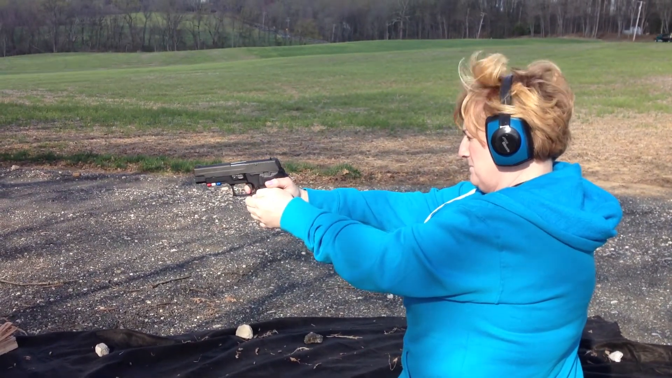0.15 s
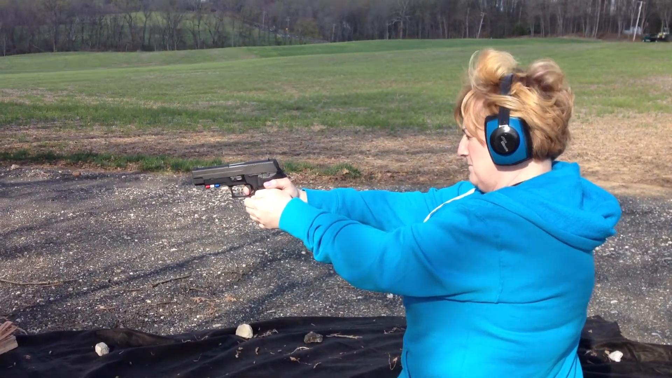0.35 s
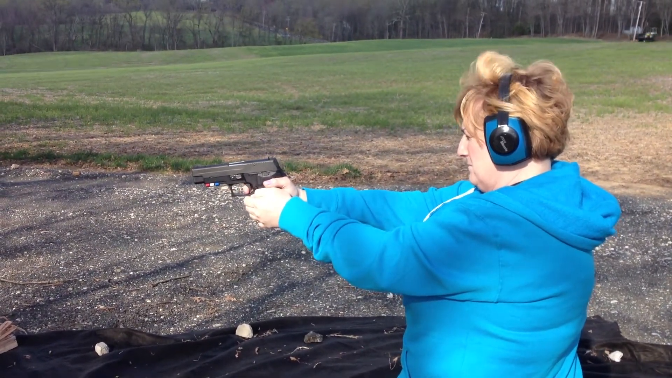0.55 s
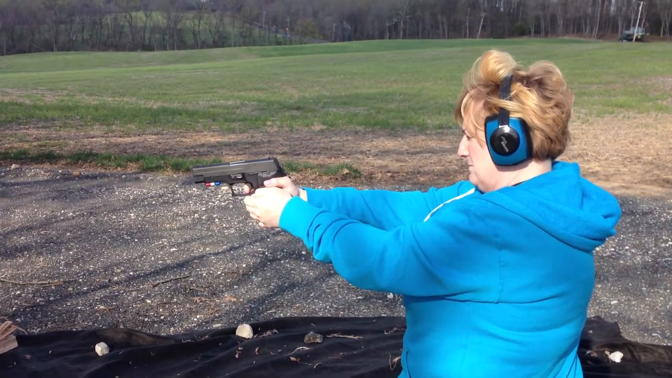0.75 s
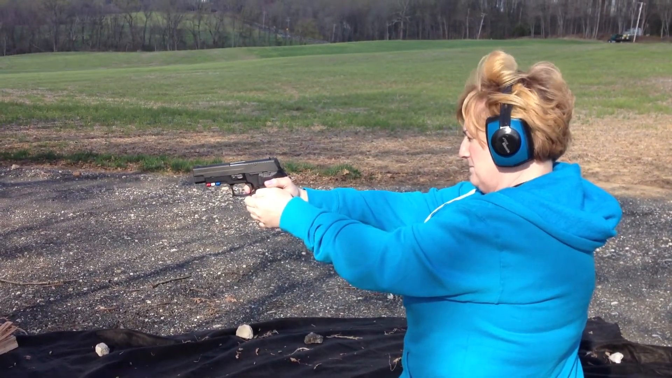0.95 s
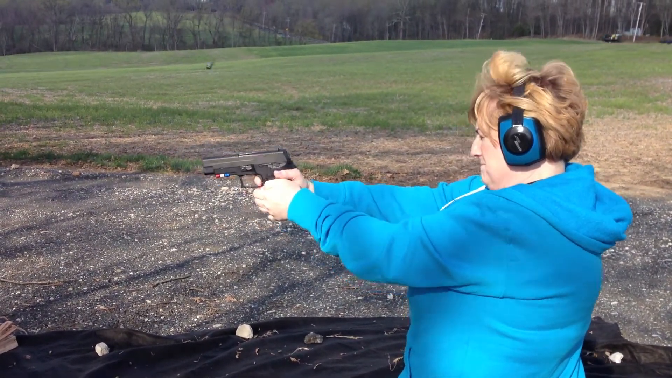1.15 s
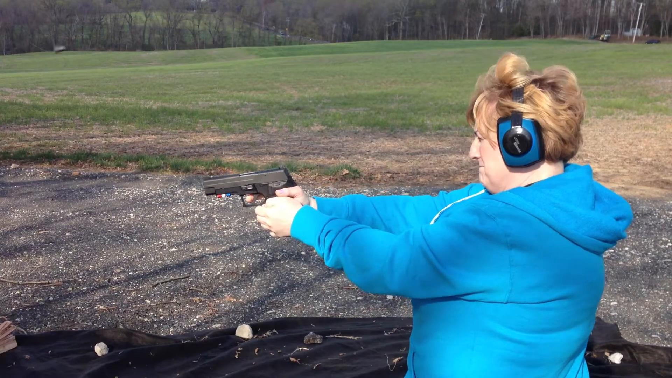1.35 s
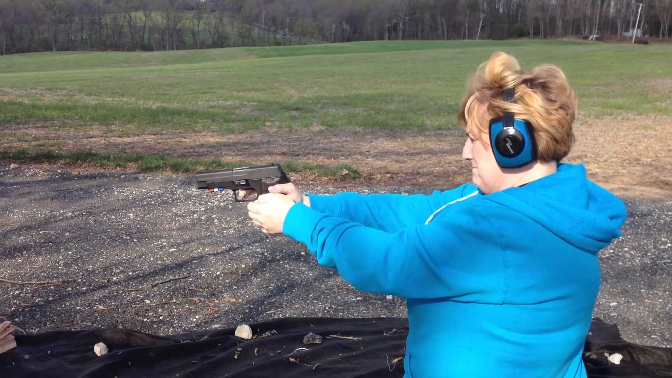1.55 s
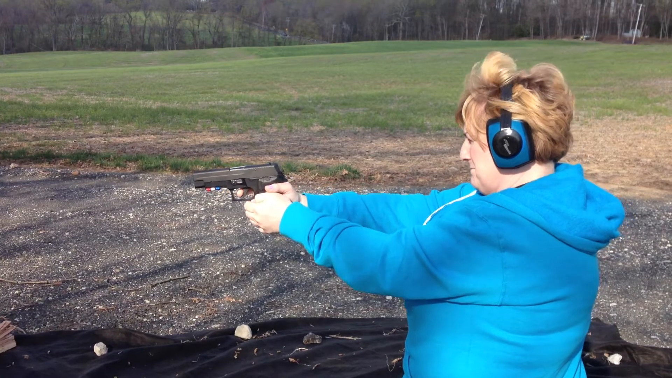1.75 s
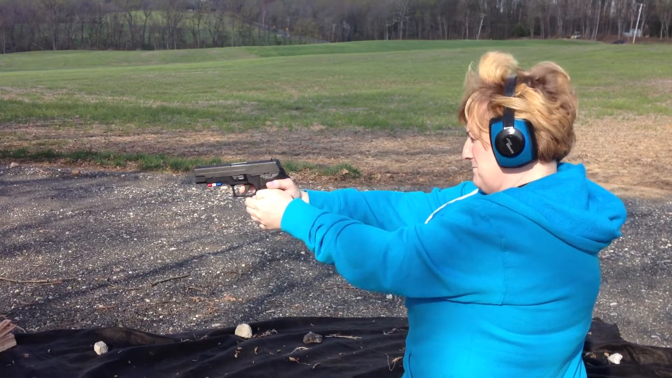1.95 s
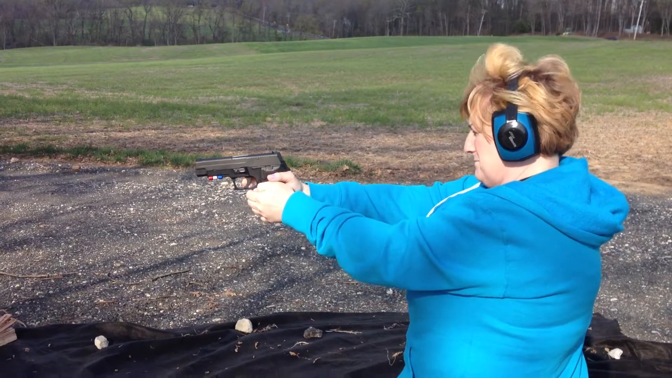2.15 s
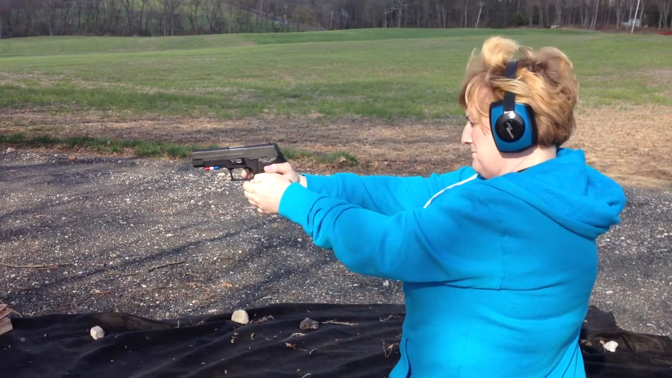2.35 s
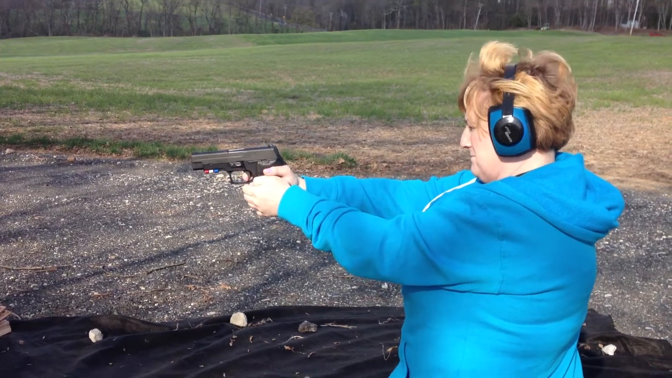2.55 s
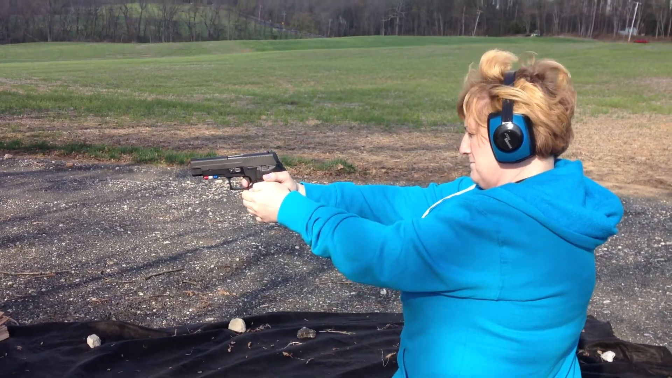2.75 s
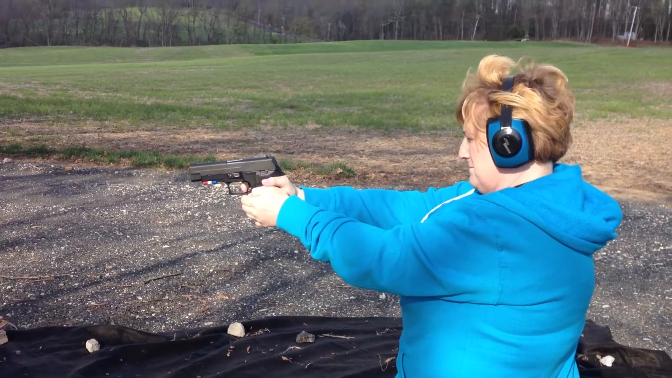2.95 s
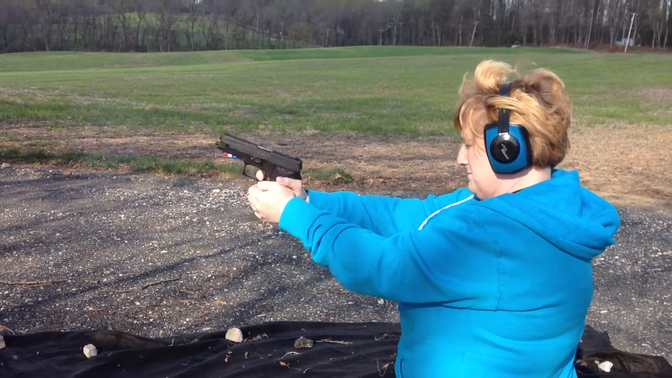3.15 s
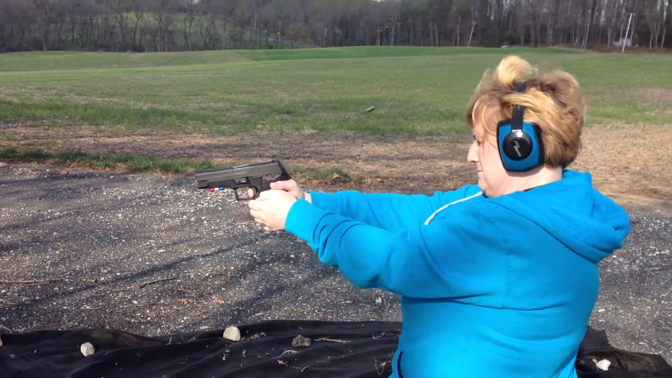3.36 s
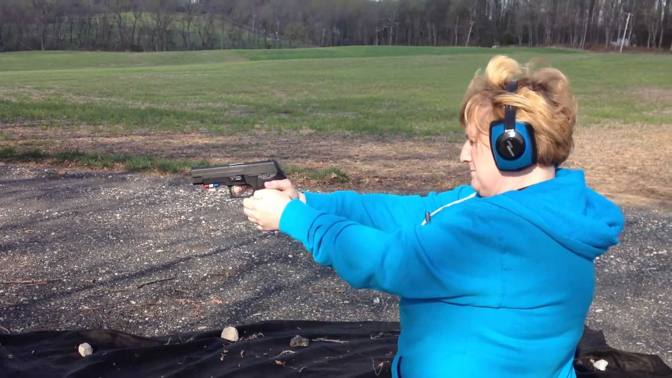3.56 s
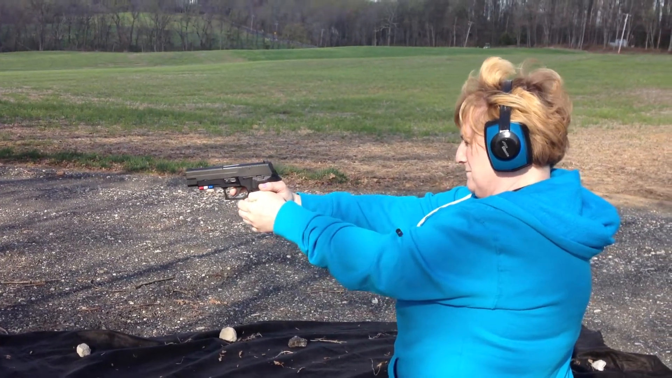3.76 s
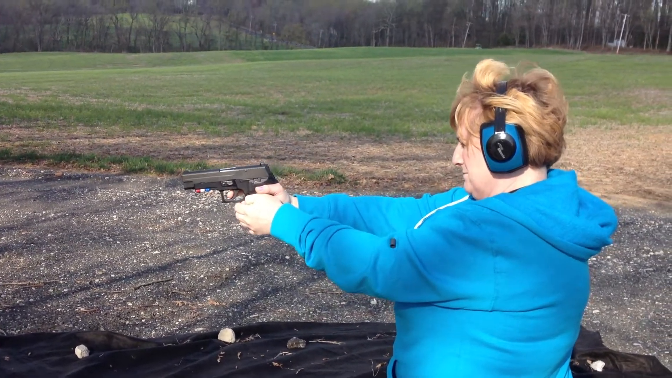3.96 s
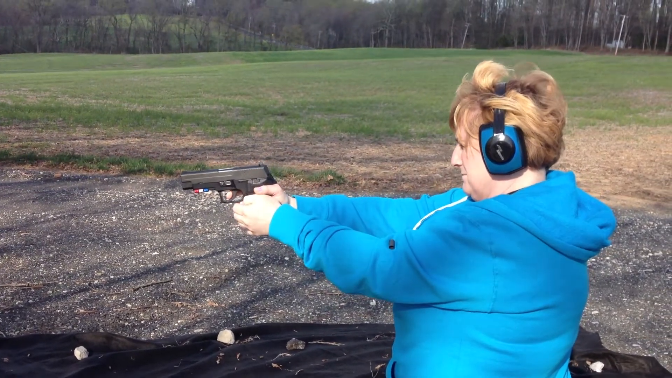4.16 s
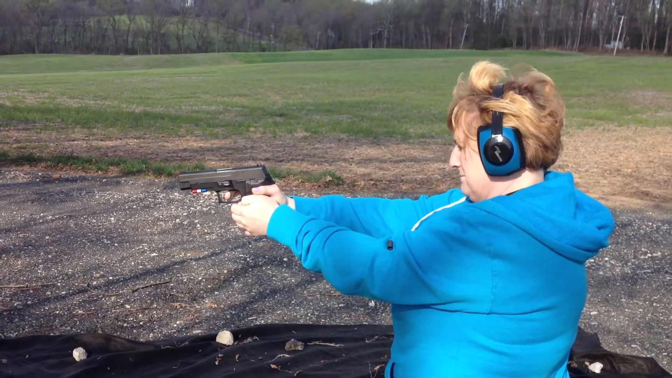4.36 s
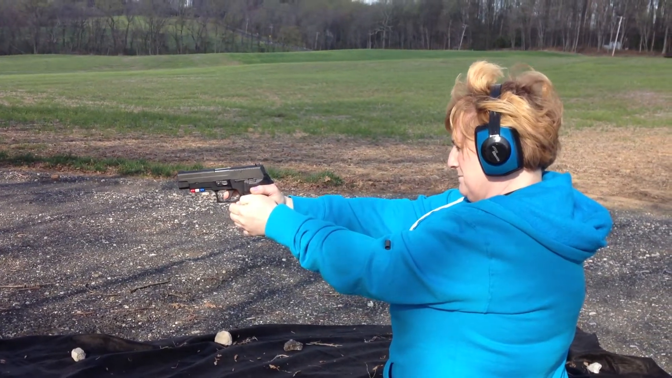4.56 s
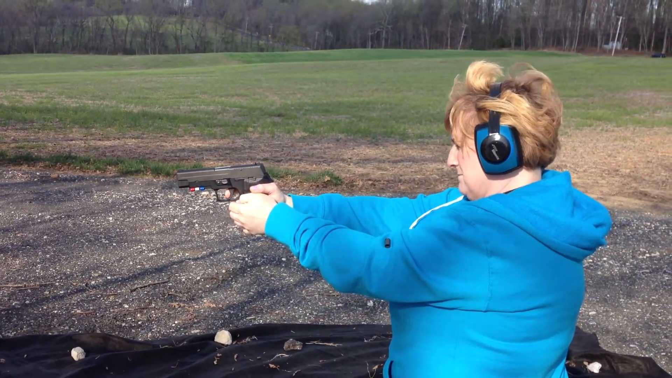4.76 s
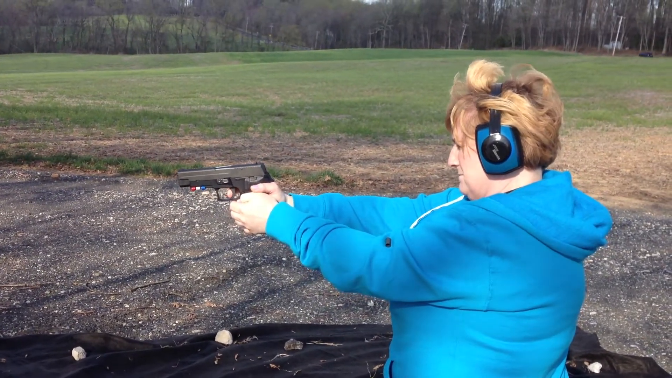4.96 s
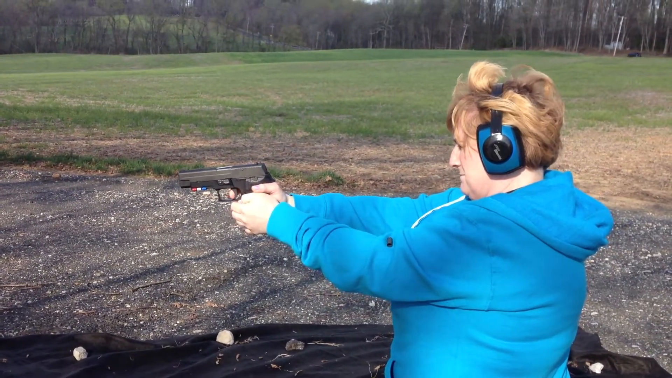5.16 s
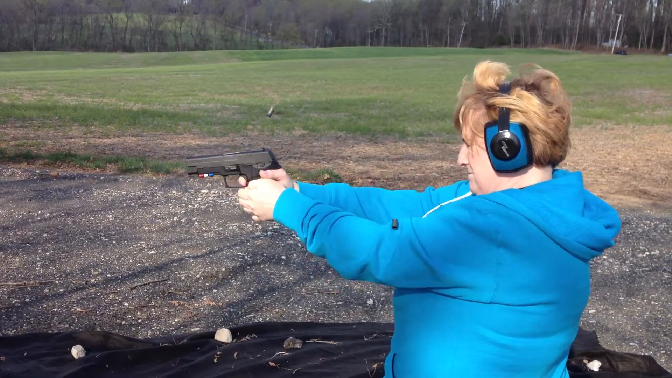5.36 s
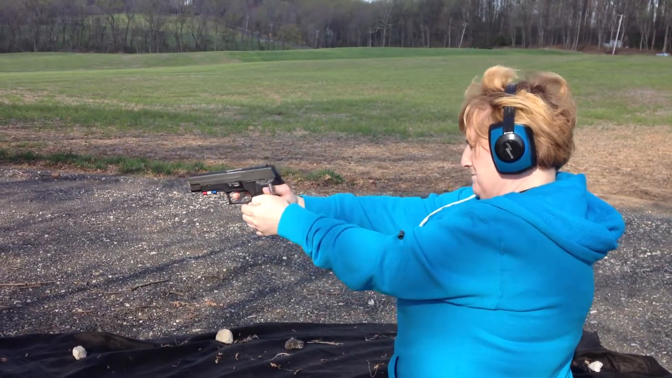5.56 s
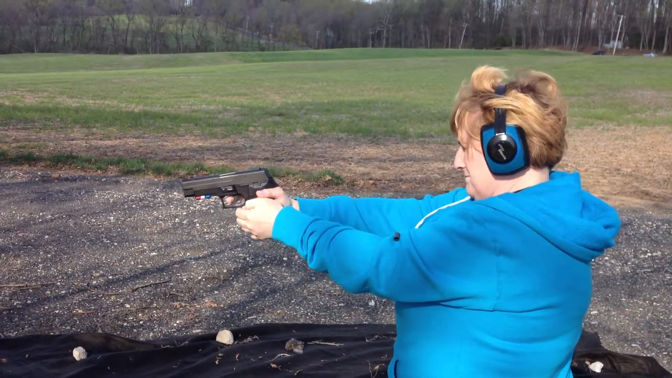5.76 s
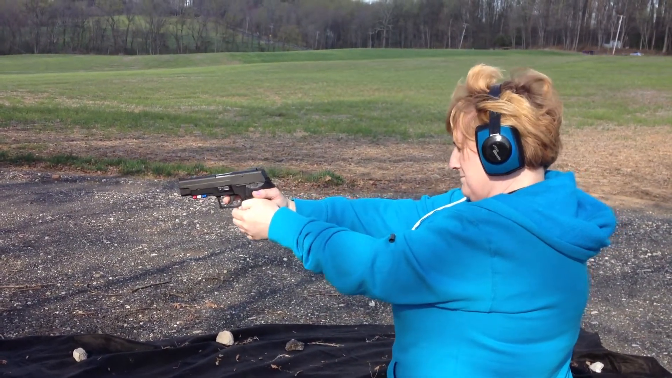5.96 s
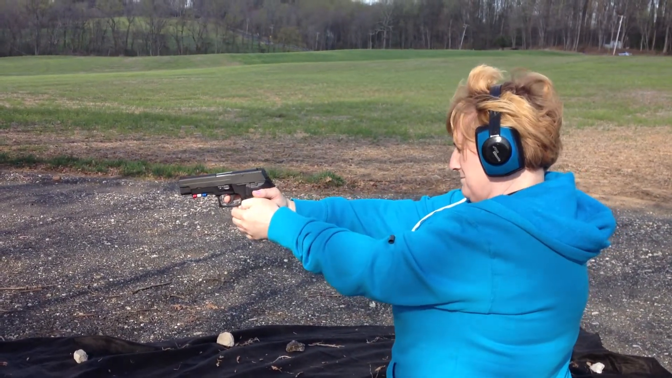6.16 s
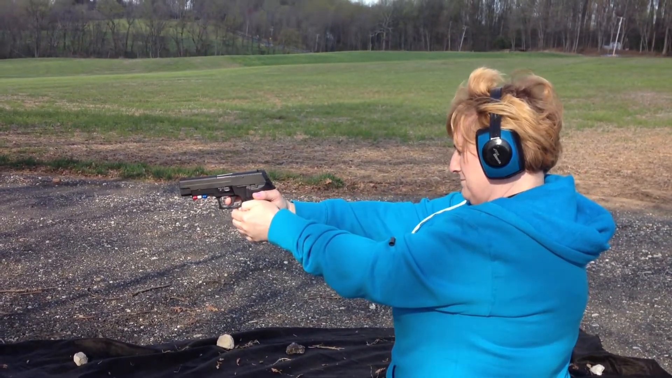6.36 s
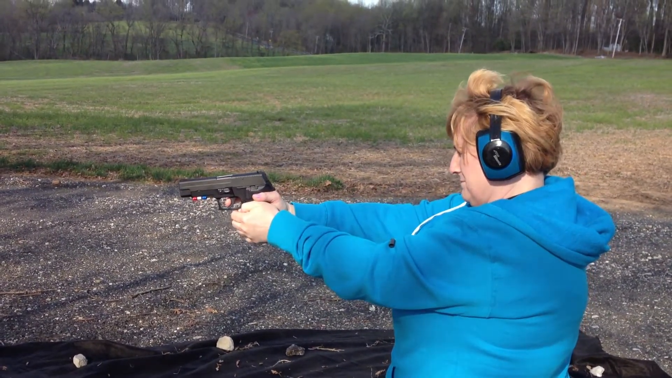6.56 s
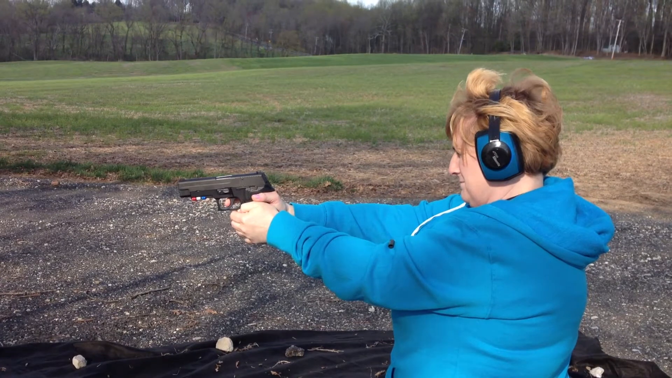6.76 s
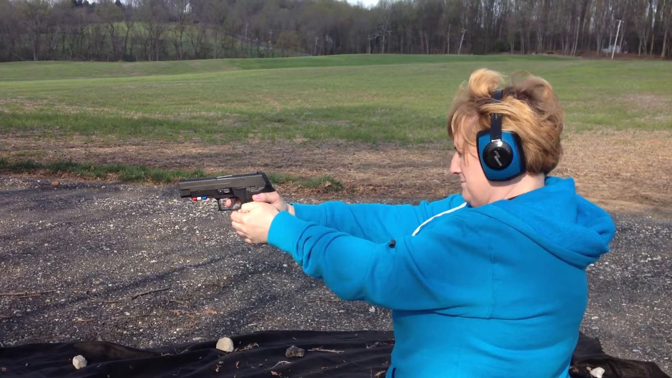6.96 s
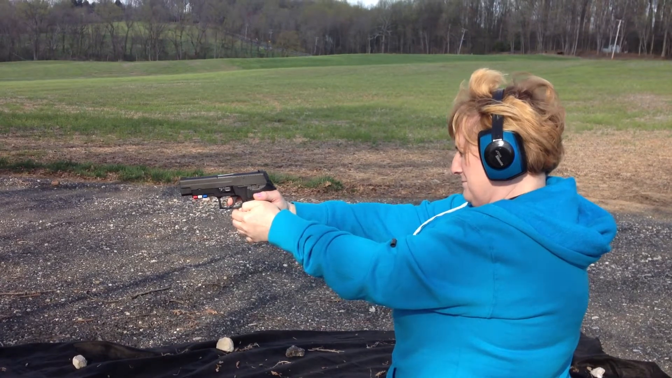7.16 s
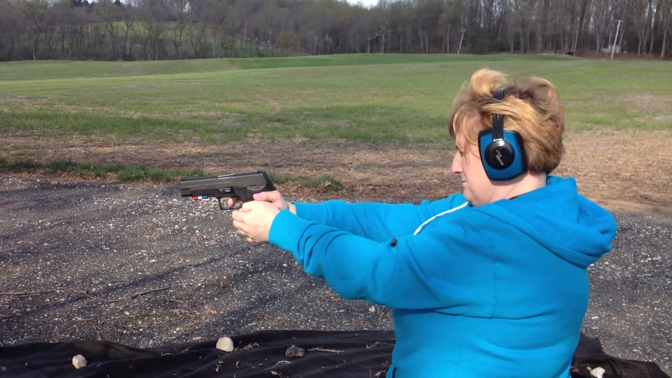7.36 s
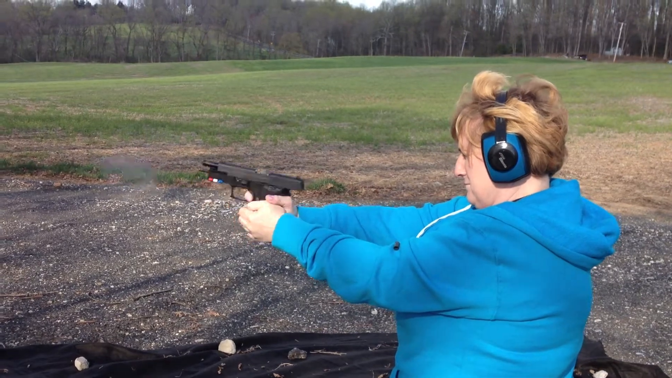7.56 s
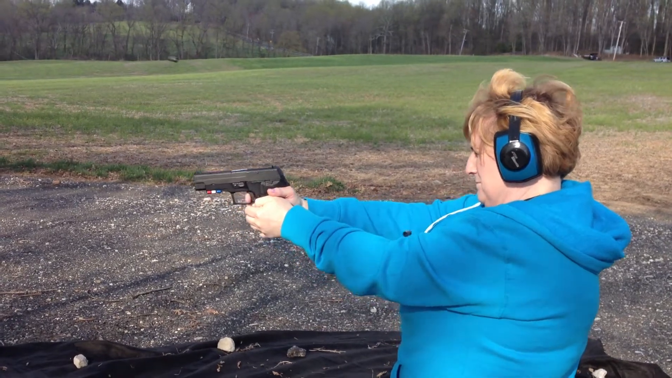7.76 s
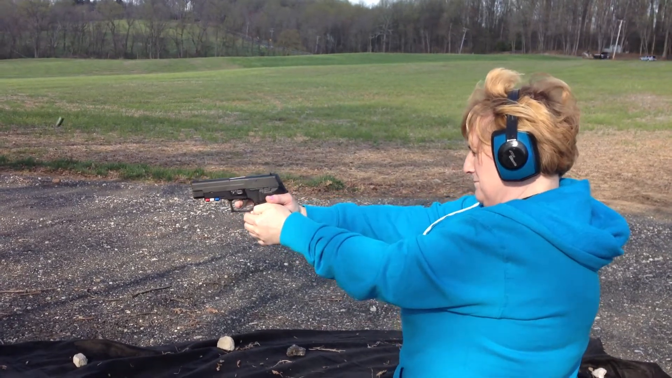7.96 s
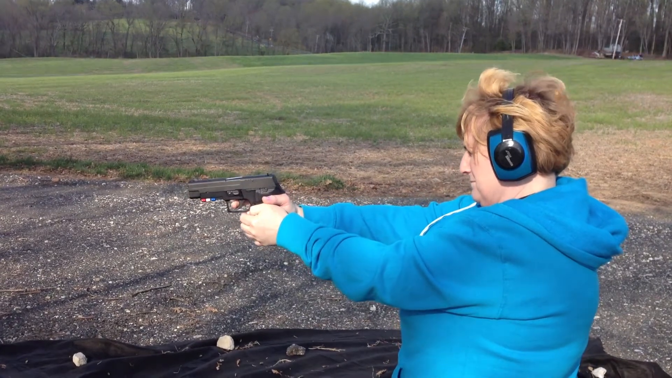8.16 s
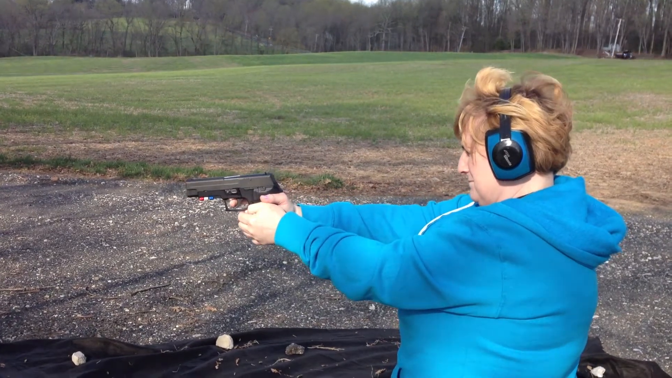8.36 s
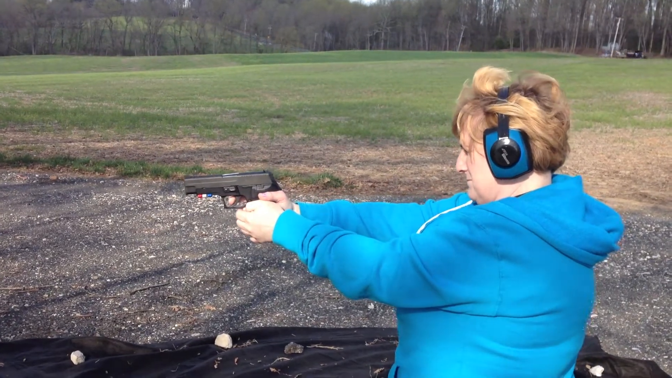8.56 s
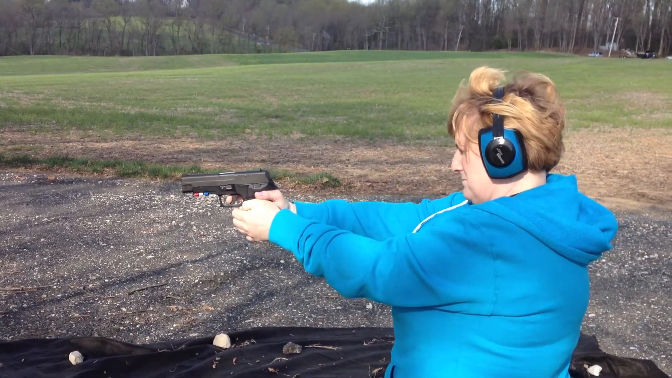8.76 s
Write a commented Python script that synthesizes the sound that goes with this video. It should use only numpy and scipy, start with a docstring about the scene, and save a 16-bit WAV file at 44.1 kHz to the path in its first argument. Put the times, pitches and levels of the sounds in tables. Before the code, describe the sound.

An open outdoor gravel range, heard through a small microphone a couple of metres from a pistol. The first second holds faint hiss, a smooth wash of distant trees, leaf rustle and a low wind bump near 0.7. Sharp, overloaded shots crack at about 1.05, 3.15, 5.25 and 7.6 seconds, each a very short tearing blast with a midrange body, then a dense rolling echo from banks and trees, fading within a second. The background ducks after each blast and creeps back. A quiet double click of the trigger follows roughly 0.3 seconds after each shot. Small ticks of cases and grit on gravel come near 1.9, 6.1 and 8.5, with a tiny metallic ring at 6.16. Wind buffets in low, ragged thumps, notably at 1.4, 1.9, 2.7, 3.7 and 8.4, while dry leaves hiss and crackle to the end near 9 seconds.

```python
"""Slow pistol fire on a gravel range

Four shots on open ground, a couple of metres from a small microphone: noise bursts with slow pressure swings.
Each blast overloads the recorder, whose gain drops and creeps back under a rolling echo of scattered noise.
After each shot the trigger resets with a double click; cases and grit tick on the gravel, and one case rings.
Wind buffets the microphone as low, ragged swings, stirs dry leaves into hiss and ticks,
and washes through far trees as smooth noise; the microphone adds a faint steady hiss."""
import sys
import numpy as np
from scipy import signal
from scipy.fft import rfft, irfft, next_fast_len
from scipy.io import wavfile
from scipy.ndimage import uniform_filter1d

SR = 44100
rng = np.random.default_rng(int(sys.argv[2]) if len(sys.argv) > 2 else 0)


def int16_out(signal):
    """Quantize to a 16-bit WAV file."""
    q = np.round(np.clip(np.atleast_2d(signal).T, -1, 1) * 32767)
    wavfile.write(sys.argv[1], SR, q.astype(np.int16))


N = 388067

# the shots: [t/s, relative blast level/dB, relative echo level/dB]
SHOTS = [(1.0543, 15, 14.5), (3.1598, 13.5, 12), (5.2598, 13, 12.5), (7.5911, 13.5, 12.5)]


def pistol(patchy_db=2):
    """Every shot excites the same surroundings, whose clumps of trees answer unevenly."""
    t = np.arange(SR) / SR
    out = np.zeros(N)
    shock, terrain = rng.standard_normal((2, SR))
    # unevenness over frequency bins and 128-sample delay steps
    clumps = rng.standard_normal((129, SR // 100))
    clumps = uniform_filter1d(clumps, size=6, axis=0)
    clumps = uniform_filter1d(clumps, size=4, axis=1)
    patches_db = patchy_db * evened(clumps)
    for s, blast_db, echo_db in SHOTS:
        add(out, s, amp(blast_db) * blast(shock, t))
        add(out, s, amp(echo_db) * echo(terrain, patches_db, t))
    return out


# spectrum of the tearing crack: [f/Hz, relative level/dB]
CRACK_COLOUR = [(300, -35), (1200, -7.5), (2000, 2), (3000, 0), (4500, 0), (6500, 3), (9000, 2),
                (10500, -2), (14000, -2), (15700, -8)]
# spectrum of the body: [f/Hz, relative level/dB]
BODY_COLOUR = [(20, -27), (60, -27.5), (150, -13), (280, -6), (450, -4), (700, -1), (1000, -3), (1330, 3.5),
               (1850, -11.5), (3000, -25.5), (8000, -57)]
# muzzle blast, then slamming slide: [peak t/s after the shot, relative crack level/dB,
# relative body level/dB, fall/dB per s]
SURGES = [(.0047, 1.5, 3, 498), (.029, -3, 3, 1301.5)]
# slow pressure swings: [centre t/s after the shot, f/Hz, relative level/dB]
THUMPS = [(.006, 36, -42), (.0365, 195, -19.5)]
CRACK_DB, BODY_DB = -14.5, -13.5
CRACK_SWELL_S, BODY_SWELL_S, BODY_DELAY_S = .005, .003, .0022  # the body follows the crack
# the crack comes back off the near gravel
SIZZLE_S, SIZZLE_RISE_S, SIZZLE_DB, SIZZLE_FALL_DB_PER_S = .048, .015, -14, 266.5


def blast(shock, t):
    """Muzzle blast and slide: a body alike in every shot, a fresh tearing crack and slow pressure swings."""
    sizzle = amp(SIZZLE_DB) * surge(t - SIZZLE_S, SIZZLE_RISE_S, SIZZLE_FALL_DB_PER_S)
    crack_power = sizzle ** 2
    body_power = 0
    for s, crack_db, body_db, fall in SURGES:
        crack_power += (amp(crack_db) * surge(t - s, CRACK_SWELL_S, fall)) ** 2
        body_power += (amp(body_db) * surge(t - s - BODY_DELAY_S, BODY_SWELL_S, fall)) ** 2
    crack = amp(CRACK_DB) * colour(np.sqrt(crack_power) * rng.standard_normal(len(t)), CRACK_COLOUR)
    body = amp(BODY_DB) * colour(np.sqrt(body_power) * shock, BODY_COLOUR)
    thumps = np.zeros(len(t))
    for s, hz, db in THUMPS:
        swing = np.cos(2 * np.pi * hz * (t - s))
        thumps += amp(db) * swing * np.exp(-(hz * (t - s)) ** 2)
    return crack + body + thumps * np.minimum(t / .002, 1)  # the swings start from rest


def surge(t, rise_s, fall_db_per_s):
    """Swells its last 20 dB in rise_s, reaches one at t = 0, then dies away."""
    return amp(np.minimum(20 * t / rise_s, -fall_db_per_s * t))


# single echoes off banks and fixtures: [t/s after the shot, relative level/dB]
ECHOES = [(.0460, 0), (0.0513, -8.5), (.071, -7.5), (0.0906, -11), (.096, -4), (.1295, -7.5),
          (0.1483, -9.5)]
# spectrum of the whole echo: [f/Hz, relative level/dB]
ECHO_COLOUR = [(60, -62.5), (120, -30.5), (210, -12.5), (300, -0.5), (410, -5), (520, 0), (620, 1),
               (850, -1), (1180, -1.5), (1420, -4.5), (1650, -9.5), (2250, -11), (3100, -18.5), (4400, -24),
               (8000, -26), (15500, -45.5)]
# loss along the path, on top of the ground loss: [f/Hz, loss/dB per s]
AIR = [(200, -2), (900, 5), (2000, 20.5), (4200, 20.5), (8000, 57), (14000, 119.5)]
# how much scatter is alike in every shot: [f/Hz, share of power]
REPEAT = [(1000, 1), (2200, 0.99), (4000, 1), (7000, .05)]
ECHO_DB = 10.5  # single echoes against the scatter


def echo(terrain, patches_db, t):
    """The range answers each shot alike up to the mid treble; above, moving air scrambles and absorbs it."""
    alike = np.clip(read(REPEAT, np.fft.rfftfreq(len(t), 1 / SR)), 0, 1)
    fresh = rfft(rng.standard_normal(len(t)))
    scatter = irfft(np.sqrt(alike) * rfft(terrain) + np.sqrt(1 - alike) * fresh, len(t))
    hz, delay, z = signal.stft(roll(t) * scatter, SR, nperseg=256)
    air_db = read(AIR, hz)[:, None] * (delay - 0.1814)  # zero at this delay
    z = z * amp(patches_db[:len(hz), :len(delay)] - air_db)
    paths = signal.istft(z, SR, nperseg=256)[1][:len(t)]
    for s, db in ECHOES:  # broad surfaces return a rounded pressure wave
        add(paths, s, amp(ECHO_DB + db) * signal.windows.hann(29) / 14)
    return colour(paths, ECHO_COLOUR)


# scatter from gravel, grass and trees starts at the first bank, then thins with distance
SCATTER_DB, SCATTER_START_S, SCATTER_RISE_S = -19, .044, .006
SPREAD_S, SPREAD_POWER, GROUND_LOSS_DB_PER_S = .11, 3.23, 34
TREE_LINE_S, TREE_LINE_WIDTH_S, TREE_LINE_DB = .388, .016, 3.5  # the edge of the wood answers late


def roll(t):
    """Strength of the scatter: it spreads and fades with distance, and swells once at the tree line."""
    onset = np.clip((t - SCATTER_START_S) / SCATTER_RISE_S, 0, 1)
    tree_line = np.exp(-((t - TREE_LINE_S) / TREE_LINE_WIDTH_S) ** 2)
    strength = amp(SCATTER_DB - GROUND_LOSS_DB_PER_S * t + TREE_LINE_DB * tree_line)
    spreading = np.sqrt(1 + (t / SPREAD_S) ** SPREAD_POWER)
    return onset * strength / spreading


# first click of each trigger reset: [t/s, relative level/dB]
RESETS = [(1.326, -30), (3.4465, -31.5), (5.536, -29), (7.8601, -31)]
# spent cases and loose grit on the gravel: [t/s, relative level/dB]
TICKS = [(0.101, -55.5), (.2264, -58), (.844, -62), (1.8612, -52), (1.888, -45), (2.123, -59), (6.102, -43),
         (6.493, -55), (8.4193, -53), (8.6357, -55)]
# spectrum of the contacts: [f/Hz, relative level/dB]
CLICK_COLOUR = [(1000, -33), (3000, -8), (4500, -3.5), (7000, -0.5), (9000, 3.5), (11000, -11.5),
                (13500, -3), (15500, -18)]
RESET_GAP_S = .0145  # between the two clicks of a reset
PING_S, PING_HZ, PING_DB, PING_T60_S = 6.162, 2300, -48, .04  # one case rings on a stone


def clicks(hold_s=0.00095, decay_s=0.0022, ring_db=-20, ring_s=0.018):
    """Trigger, landing cases and grit: each contact is a brief noisy scrape with a faint tail."""
    t = np.arange(SR // 10) / SR
    out = np.zeros(N)
    scrape = np.exp(-np.maximum(t - hold_s, 0) / decay_s)
    shape = scrape + amp(ring_db) * np.exp(-t / ring_s)
    second_clicks = [(s + RESET_GAP_S, db) for s, db in RESETS]
    for s, db in TICKS + RESETS + second_clicks:
        add(out, s, amp(db) * shape * rng.standard_normal(len(t)))
    out = colour(out, CLICK_COLOUR)
    ping = amp(PING_DB - 60 * t / PING_T60_S) * np.sin(2 * np.pi * PING_HZ * t)
    add(out, PING_S, ping)
    return out


# the hardest eddies on the microphone: [peak t/s, half length/s, relative level/dB]
BUFFETS = [(.688, 0.0044, -18.5), (0.7, 0.049, -29.5), (1.373, 0.013, -14.5), (1.882, 0.0073, -23.5),
           (2.322, 0.015, -24), (2.657, 0.0036, -18), (2.693, 0.012, -18.5), (2.837, 0.015, -21),
           (3.107, 0.005, -22), (3.143, 0.012, -23), (3.671, 0.0036, -17.5), (3.811, 0.0065, -21),
           (3.921, 0.0057, -25.5), (4.67, 0.011, -22), (4.86, 0.016, -31.5), (5.915, 0.011, -28.5),
           (6.656, 0.0098, -26), (7.131, .012, -29), (8.403, 0.006, -21.5), (8.444, 0.011, -26.5)]
# spectrum of small fast eddies, also played by wind(): [f/Hz, relative level/dB]
FLUTTER_COLOUR = [(120, -25), (300, 3.5), (460, -5), (700, -18.5), (1200, -42.5), (6000, -80)]


def buffets(gain_db=1, eddy_hz=190, spread=.2, waver_hz=90, tear=.3, port_hz=105):
    """Each hard eddy gives a short, ragged push and pull; the port holds back the deep bass."""
    t = np.arange(N) / SR
    push = np.zeros(N)
    for s, half_s, db in BUFFETS:
        push += amp(db + gain_db) * np.exp(-np.minimum(abs(t - s) / half_s, 10) ** 1.4)
    wavering_hz = eddy_hz * np.exp(spread * wander(waver_hz))
    swing = np.sin(2 * np.pi * np.cumsum(wavering_hz) / SR)
    ragged = colour(rng.standard_normal(N), FLUTTER_COLOUR)
    port = signal.butter(3, port_hz, "highpass", fs=SR, output="sos")
    return signal.sosfilt(port, push * (swing + tear * ragged))


# strength of the wind at the microphone: [t/s, level/dB]
WIND = [(0, -47.5), (.35, -46.5), (.72, -34.5), (.84, -57.5), (.96, -39.5), (1.5, -37), (1.8, -30.5),
        (2.1, -35.5), (2.75, -32.5), (3.48, -38), (3.87, -33.5), (4.07, -41.5), (4.35, -35), (4.6, -43.5),
        (5.15, -49.5), (5.8, -50), (5.95, -33.5), (6.12, -45.5), (6.55, -35), (7.1, -42), (7.25, -58.5),
        (7.52, -39.5), (8.1, -45), (8.46, -33), (8.8, -45.5)]
# spectrum of the wind rumble: [f/Hz, relative level/dB]
WIND_COLOUR = [(20, -46.5), (55, -31.5), (85, -14.5), (135, 1), (200, -1.5), (270, -7.5), (350, -12.5),
               (500, -28), (800, -38.5), (2000, -64)]


def wind(lumps_db=5.0, lump_rate_hz=26, bright_db=-24):
    """Turbulence at the microphone port: random eddies, brighter when it blows harder."""
    strength = curve_gain(WIND, np.arange(N) / SR)
    lumps = evened(amp(lumps_db * np.clip(wander(lump_rate_hz), -2, 2)))
    flow = strength * lumps
    rumble = colour(rng.standard_normal(N), WIND_COLOUR)
    flutter = colour(rng.standard_normal(N), FLUTTER_COLOUR)
    brightness = amp(bright_db) * flow / np.mean(flow)
    return flow * (rumble + brightness * flutter)


# dry leaves: [t/s, relative level/dB]
RUSTLE = [(.2, -68), (.6, -76.5), (1.3, -78.5), (2, -65), (2.9, -78), (3.7, -71), (4.15, -68),
          (4.65, -66.5), (5, -74.5), (5.9, -68.5), (6.15, -62), (6.65, -62.5), (7.4, -71.5), (8.15, -73.5),
          (8.5, -65), (8.8, -68)]
# spectrum of the leaves: [f/Hz, relative level/dB]
LEAVES_COLOUR = [(1500, -15), (3200, -4), (5200, -3.5), (7500, 3), (10000, -4), (12500, 0.5), (14700, -2),
                 (15600, -9)]
# wind in the far trees: [t/s, level/dB]
TREES = [(0, -51), (2, -53.5), (2.8, -51.5), (3.9, -55.5), (5.1, -52), (6.1, -55.5), (6.95, -52),
         (8.4, -55.5), (8.8, -52)]
# spectrum of the far trees: [f/Hz, relative level/dB]
FAR_COLOUR = [(30, -18.5), (150, 3.5), (400, -0.5), (700, -0.5), (1200, -0.5), (1950, -7), (2800, -22),
              (4300, -33), (8000, -42.5)]


def breeze(swell_db=1.44, leaves_db=-4.5, crackle_db=-3, grain_db=5, grains_per_s=320):
    """Smooth wash of distant trees, and dry leaves that hiss and tick in the gusts."""
    t = np.arange(N) / SR
    swell = amp(swell_db * wander(5.6))
    wash = curve_gain(TREES, t) * swell * colour(rng.standard_normal(N), FAR_COLOUR)
    # ticks at random moments, of uneven strength, each a noise grain with a 1.5 ms decay
    grains = rng.random(N) < grains_per_s / SR
    ticks = grains * amp(grain_db * np.minimum(rng.exponential(1, N), 3))
    envelope = signal.lfilter([1], [1, -np.exp(-1 / (0.0015 * SR))], ticks)
    crackle = evened(envelope * rng.standard_normal(N))
    rustle = amp(leaves_db) * rng.standard_normal(N) + amp(crackle_db) * crackle
    return wash + curve_gain(RUSTLE, t) * colour(rustle, LEAVES_COLOUR)


def hiss(hiss_db=-75):
    """Steady noise of the microphone itself."""
    # [f/Hz, relative level/dB]
    spectrum = [(100, 6.5), (3000, 8.0), (8500, 1.5), (10500, -3.5), (15500, -4)]
    return amp(hiss_db) * colour(rng.standard_normal(N), spectrum)


def amp(db):
    """Decibels to gain."""
    return 10 ** (np.asarray(db) / 20)


def evened(x):
    """Scales to an rms of one."""
    return x / np.sqrt(np.mean(x ** 2) + 1e-20)


def read(points, hz):
    """Reads a table on a log-frequency axis."""
    f, value = np.transpose(points)
    return np.interp(np.log(hz + 1), np.log(f + 1), value)


def curve_gain(rows, t):
    """Gain of a dB curve at the times t."""
    return amp(np.interp(t, *np.transpose(rows)))


def add(mix, s, sound):
    """Mixes a sound in at s seconds."""
    part = mix[max(round(s * SR), 0):][:len(sound)]
    part += sound[:len(part)]  # a view, so the mix itself changes


def colour(x, points, size=4096):
    """Causal minimum-phase filter of unit energy with the given spectrum."""
    log_gain = np.log(amp(read(points, abs(np.fft.fftfreq(size, 1 / SR)))))
    response = np.exp(np.conj(signal.hilbert(log_gain)))
    taps = np.fft.ifft(response).real[:size // 2]
    return signal.oaconvolve(x, taps / np.linalg.norm(taps))[:len(x)]


def wander(rate_hz):
    """Slow random motion of rms one, fading out around the given rate."""
    size = next_fast_len(N, True)
    hz = np.fft.rfftfreq(size, 1 / SR)
    spectrum = rfft(rng.standard_normal(size)) * np.exp(-(hz / rate_hz) ** 2)
    return evened(irfft(spectrum, size)[:N])


def scene():
    """Shots, clicks and weather at one microphone."""
    return (pistol() + clicks() + wind() + buffets() + breeze() + hiss())[None]


def record(dry, limit_db=-10.0, recovery_db_per_s=10, ceiling=0.63, edge_hz=15750):
    """Gain control drops at each blast and recovers slowly; peaks saturate; then the band limit."""
    power = abs(uniform_filter1d(dry[0] ** 2, size=SR // 50))  # 20 ms average
    power_db = 10 * np.log10(power + 1e-12)
    # a peak hold that sinks at the recovery rate
    climb = np.arange(N) / SR * recovery_db_per_s
    held_db = np.maximum.accumulate(power_db + climb) - climb
    over_db = np.maximum(held_db - limit_db, 0)
    squashed = ceiling * np.tanh(dry * amp(-over_db) / ceiling)
    band_limit = signal.firwin(401, edge_hz, window=("kaiser", 8), fs=SR)
    return signal.oaconvolve(squashed, band_limit[None], "same")


dry = scene()
out = record(dry)
int16_out(out)
```